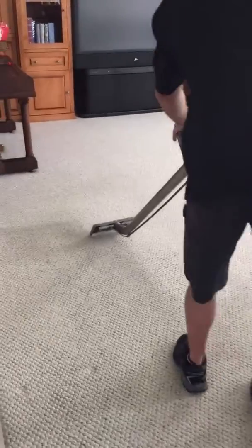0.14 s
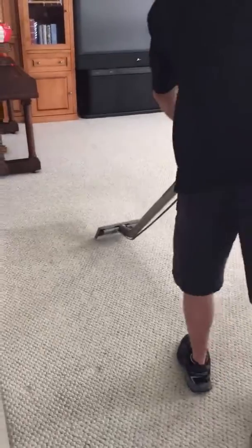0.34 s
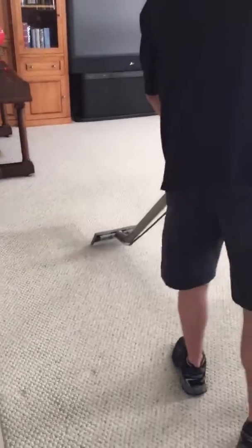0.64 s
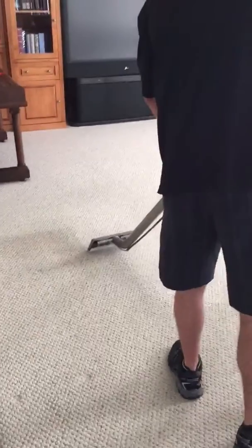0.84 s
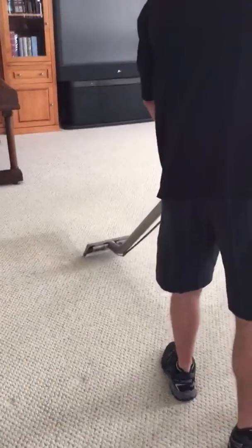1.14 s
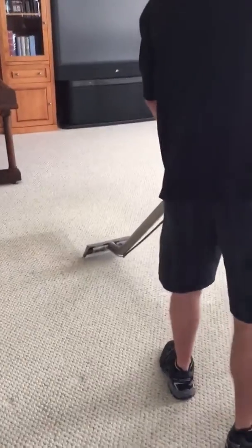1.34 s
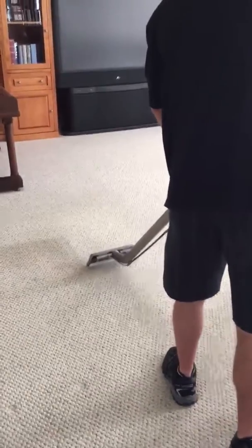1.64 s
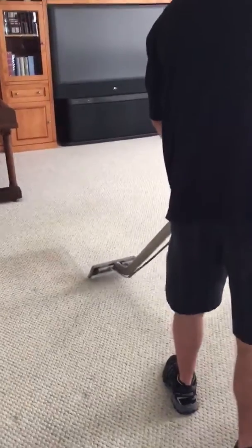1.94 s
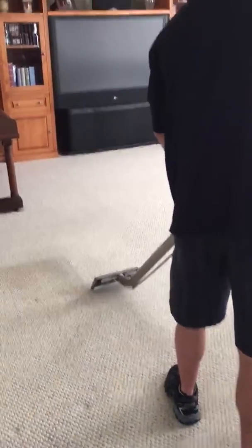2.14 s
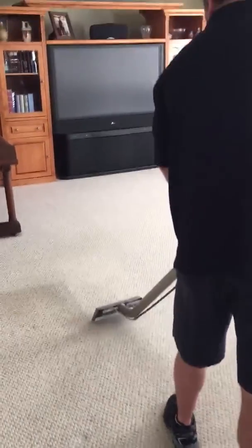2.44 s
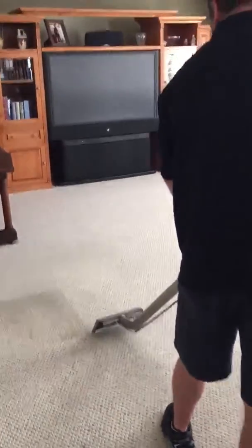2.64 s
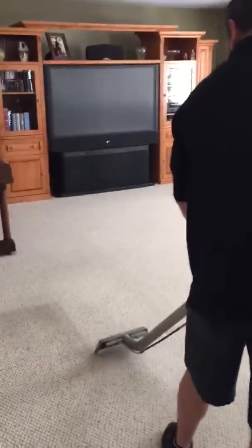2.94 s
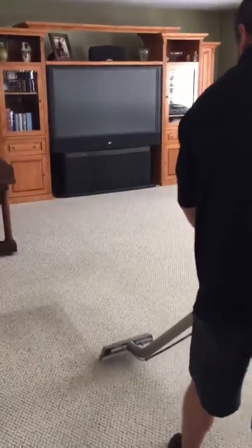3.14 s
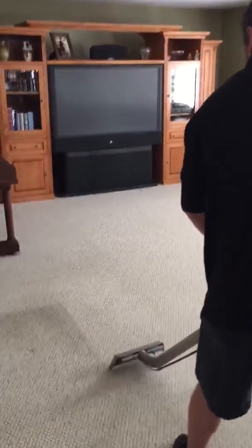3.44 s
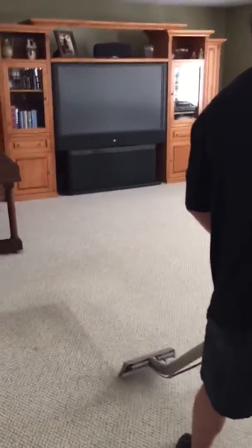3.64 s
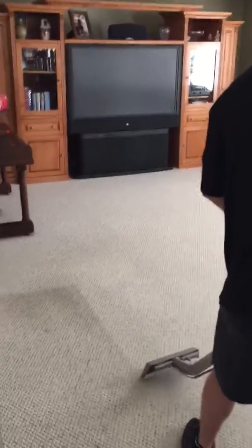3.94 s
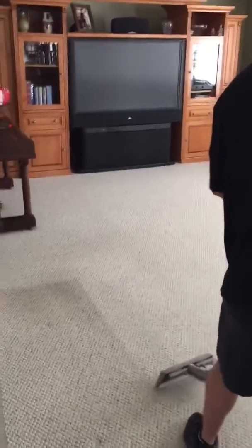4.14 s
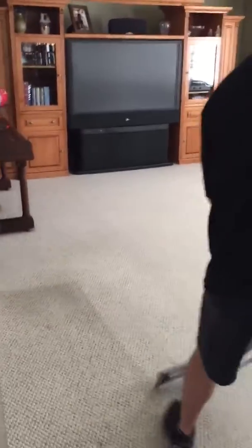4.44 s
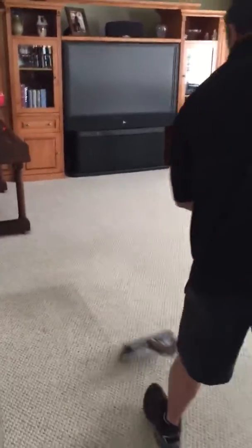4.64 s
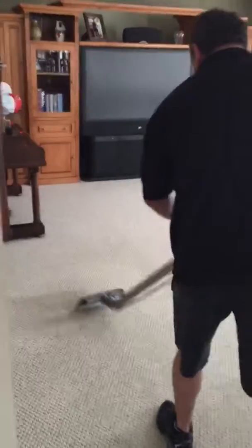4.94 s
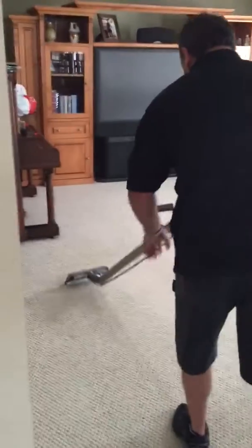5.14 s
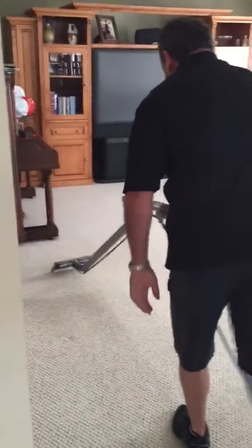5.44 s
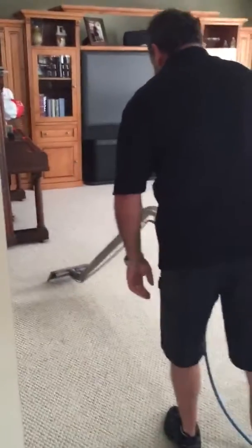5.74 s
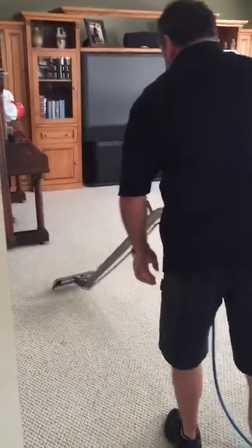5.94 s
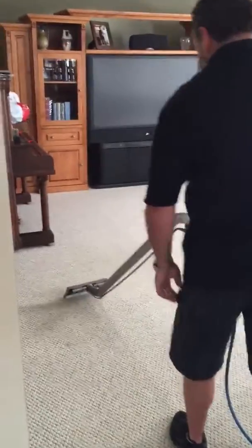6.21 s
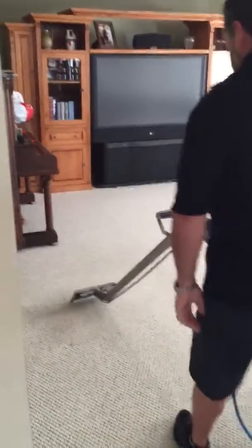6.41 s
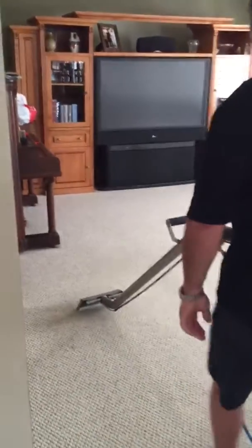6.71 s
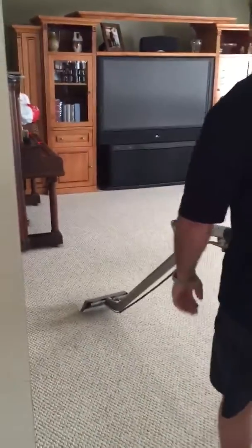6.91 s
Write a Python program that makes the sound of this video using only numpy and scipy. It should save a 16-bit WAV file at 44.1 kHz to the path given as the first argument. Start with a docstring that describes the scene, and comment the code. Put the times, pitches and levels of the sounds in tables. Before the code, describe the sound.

A carpet cleaning wand hisses brightly with steady suction over a low throbbing vacuum hum, then gulps air hollowly and rubs the pile before settling.

```python
"""A carpet extraction wand is drawn over carpet in a living room, while the vacuum blower hums some way off.
From the start, air hisses through the sealed slot (coloured noise) and the blower throbs (wavering tones).
After a second the lip lifts for a moment. At about four seconds it starts to lift again and again, gulping
air with a hollow roar (noise and rings), and the head and hose rub low and lumpily on the pile (low noise).
At the end the steadier hiss returns. Throughout, sliding echoes colour the sound of the air."""
import sys
import numpy as np
from scipy import signal
from scipy.fft import rfft, irfft, next_fast_len
from scipy.io import wavfile
from scipy.ndimage import map_coordinates

SR = 44100
rng = np.random.default_rng(int(sys.argv[2]) if len(sys.argv) > 2 else 0)


def pcm_store(signal):
    """Save signal as 16-bit PCM."""
    levels = np.round(np.clip(np.atleast_2d(signal), -1, 1) * 32767)
    wavfile.write(sys.argv[1], SR, levels.astype(np.int16).T)


N = 311787
TIME = np.arange(N) / SR  # s


def from_db(db):
    """Turn decibels into a gain."""
    return 10 ** (np.asarray(db) / 20)


def rms_one(x):
    """Scale a sound to an rms of 1."""
    return x / np.sqrt(np.mean(x ** 2) + 1e-20)


def in_time(rows):
    """Draw straight lines between the rows: one curve for each column after the time."""
    seconds, *columns = np.transpose(rows)
    return [np.interp(TIME, seconds, column) for column in columns]


def swell(start, attack, hold, release):
    """A gesture that rises from 0 to 1, holds and falls back; all times in s."""
    corners = start + np.cumsum([0, attack, hold, release])
    return np.interp(TIME, corners, [0, 1, 1, 0])


def drift(rate_hz):
    """Slow random wandering with an rms of 1, worked out every 40 samples."""
    pole = np.exp(-2 * np.pi * rate_hz * 40 / SR)
    noise = rng.standard_normal(N // 40 + 2002)
    slow = signal.lfilter([1], [1, -2 * pole, pole ** 2], noise)
    slow = slow[2000:]  # skip the filter's start
    return np.interp(np.arange(N) / 40, np.arange(len(slow)), rms_one(slow))


def turbulence(spectrum):
    """Churning air or rubbing: noise with the given colour, rms 1."""
    size = next_fast_len(N)
    hz, db = np.transpose(spectrum)
    bins_hz = np.maximum(np.fft.rfftfreq(size, 1 / SR), 1)
    gain = from_db(np.interp(np.log(bins_hz), np.log(hz), db, left=-70, right=-70))
    noise = rng.standard_normal(size)
    return rms_one(irfft(rfft(noise) * gain, size)[:N])


def moving_resonance(centre_hz, width_hz):
    """A band of noise around a pitch that may move, like air ringing in a cavity; rms 1."""
    low = signal.butter(2, width_hz / 2, fs=SR, output="sos")
    a, b = signal.sosfilt(low, rng.standard_normal((2, N)))
    phase = 2 * np.pi * np.cumsum(centre_hz * np.ones(N)) / SR
    return rms_one(a * np.cos(phase) + b * np.sin(phase))


def low_pass(cutoff_hz):
    """A gentle filter that dulls the treble."""
    return signal.butter(1, cutoff_hz, fs=SR, output="sos")


def echo(x, lag_ms):
    """The sound after a delay that may change."""
    return map_coordinates(x, [np.arange(N) - lag_ms * SR / 1000], order=1, mode="mirror")


# air through the sealed slot, before trims, lifts and flutter:
# (t/s, jet level/dB, spray level/dB, tube rush level/dB, edge control/dB)
SUCTION = [(0, -28, -32, -36, -3), (0.28, -27, -31, -37, -1.5), (0.62, -29.0, -31, -37, -2.5),
           (1.0, -28, -30, -35.5, -2), (1.7, -28, -31, -35.5, -2.5), (2.3, -28, -29, -35.5, -2.5),
           (2.85, -29.5, -32, -36, -3.3), (3.25, -28.9, -31.5, -35.5, -3), (3.9, -29.5, -32.5, -35.5, -4),
           (4.83, -29.5, -31.5, -39, -3), (4.9, -30.5, -31, -38.5, -4), (4.95, -28, -32.5, -39, -1.5),
           (5.2, -28.5, -33, -37.5, -3.5), (5.5, -30.5, -32.5, -37, -2.5), (5.9, -29.6, -32, -37.5, -2),
           (6.5, -28, -33, -36.5, -2.5), (7.07, -28.3, -30.8, -36, -2)]
# colour of the wet air rushing up the tube: (f/Hz, relative level/dB per Hz)
RUSH_COLOUR = [(200, -33), (380, -16.5), (480, -15), (570, -8.5), (760, -8.5), (1020, -4), (1500, -3),
               (2200, 0.3), (2700, -1.5), (3700, -0.5), (4400, -4), (5100, -6.5), (7000, -31), (12000, -43)]


def wand(sizzle_db, gurgle_db, spray_loss_share, uneven_db):
    """Suction makes hiss at the lip and a rush in the tube; lifting the lip trades hiss for a hollow roar."""
    jet_db, spray_db, rush_db, edge_control_db = in_time(SUCTION)
    gulp, lost_db, gained_db = open_lip(rough_db=0.2, ring_width_hz=88)
    lost_db = lost_db + uneven_db * drift(13.0)
    jet_db = jet_db - lost_db
    spray_db = spray_db - spray_loss_share * lost_db
    hiss = slot_hiss(jet_db, spray_db, edge_control_db, flutter_db=0.53, spray_flutter_db=0.6)
    sizzle = from_db(spray_db + sizzle_db) * droplets(per_s=1000, spread_db=2.5, low_hz=4500)
    trim_db = 2
    rush_gain = from_db(rush_db + gained_db + trim_db + gurgle_db * drift(30))
    rush = rush_gain * turbulence(RUSH_COLOUR)
    return hiss + sizzle, rush + gulp


# colour of the air jet in the slot: (f/Hz, relative level/dB per Hz)
JET_COLOUR = [(3500, -25), (4900, -10), (5300, -2.5), (5650, 1), (6100, 1.5), (6550, 0.5), (6950, 0),
              (7550, -2.5), (8150, -1.8), (9600, -2.5), (10050, -5), (10400, -24), (11500, -30)]
# colour of the fine water spray: (f/Hz, relative level/dB per Hz)
SPRAY_COLOUR = [(9000, -26), (10450, -2), (10850, 0.3), (12000, 1), (13200, -0.6), (14150, -2.5),
                (15100, -1.5), (16000, -12)]
# pitch of the slot edge's ring as the wand is drawn in and tilts: (t/s, f/Hz)
EDGE_PITCH = [(0, 9010), (1.2, 9320), (2.4, 9000), (3.7, 8720), (5.0, 8960), (5.9, 9080), (7.07, 9000)]


def slot_hiss(jet_db, spray_db, edge_control_db, flutter_db, spray_flutter_db):
    """A jet of air, the ring of the slot's edge and water torn to spray; they flutter as tufts pass the lip."""
    edge_gain = from_db(7.5 + 3.65 * edge_control_db)  # ring against the jet's noise
    ring = moving_resonance(in_time(EDGE_PITCH)[0], width_hz=1730)
    jet = (turbulence(JET_COLOUR) + edge_gain * ring) / np.sqrt(1 + edge_gain ** 2)
    trim_db = -0.22
    jet = jet * from_db(jet_db + trim_db + flutter_db * drift(31))
    spray = turbulence(SPRAY_COLOUR) * from_db(spray_db + spray_flutter_db * drift(16))
    return jet + spray


def droplets(per_s, spread_db, low_hz):
    """Tiny drops hit the steel throat at random: clicks without their low part make a fine sizzle, rms 1."""
    sizes = from_db(spread_db * np.minimum(rng.exponential(1, N), 4))
    sizes = sizes * rng.choice([-1, 1], N)
    hits = sizes * (rng.random(N) < per_s / SR)
    high = signal.butter(2, low_hz, "high", fs=SR, output="sos")
    return rms_one(signal.sosfilt(high, hits + 1e-18))


# the lip lifts off the pile; a negative loss makes the hiss louder: (start t/s, opening t/s, open t/s,
# closing t/s, hiss loss/dB, rush gain/dB, roar level/dB, ring f/Hz, ring level/dB)
LIFTS = [(1.21, .03, .03, .06, 1.5, -0.5, -54, 1280, -64), (3.95, 0.33, 0.12, .035, 6.0, 2, -38, 1245, -42),
         (4.37, 0.036, 0.14, 0.038, 3.5, 0.6, -37.5, 1302, -43.2),
         (4.43, 0.048, 0.085, .05, 0.1, 1, -41, 797, -44),
         (4.55, .035, 0.085, 0.096, 4.0, 1.0, -50, 947, -49),
         (4.75, 0.038, .025, 0.068, -0.8, 0.5, -41, 1090, -49),
         (5.3, 0.22, .08, 0.06, 0.3, -1.5, -44, 687, -51),
         (5.53, 0.018, 0.031, 0.04, -1, 1.5, -36.2, 1222, -37.5)]
# air that always leaks under the lip, before the head's ring is added: (t/s, level/dB)
LEAK = [(0, -48), (1.8, -60), (3.0, -47), (4.0, -46), (4.9, -51.5), (5.8, -46.5), (6.4, -46.5), (7.07, -49)]
# colour of the leaking air: (f/Hz, relative level/dB per Hz)
LEAK_COLOUR = [(380, -32), (600, -12.5), (790, -9.5), (1000, -1), (1150, -9), (1300, -6), (1500, -2),
               (1870, 1), (2220, -9), (2700, -13), (4000, -14), (8000, -30)]
# hollow colour of the gulped air: (f/Hz, relative level/dB per Hz)
ROAR_COLOUR = [(250, -33), (550, -7), (860, -5), (970, 3), (1130, -3), (1280, -7), (1400, 2), (1560, 2),
               (1850, -7), (2220, 1), (2600, -21), (4000, -16), (5500, -24), (10000, -35)]


def open_lip(rough_db, ring_width_hz):
    """Air gulped under the lip roars and rings in the head; also gives the hiss lost and rush gained in dB."""
    head_ring = from_db(-1.3) * moving_resonance(1276, width_hz=133)
    leak = from_db(in_time(LEAK)[0]) * (turbulence(LEAK_COLOUR) + head_ring)
    power, rings, lost_db, gained_db = 0, 0, 0, 0
    for start, attack, hold, release, loss_db, gain_db, roar_db, ring_hz, ring_db in LIFTS:
        opening = swell(start, attack, hold, release)
        power = power + (opening * from_db(roar_db)) ** 2
        rings = rings + opening * from_db(ring_db) * moving_resonance(ring_hz, ring_width_hz)
        lost_db = lost_db + opening * loss_db
        gained_db = gained_db + opening * gain_db
    roar = np.sqrt(power) * from_db(rough_db * drift(40)) * turbulence(ROAR_COLOUR)
    return leak + roar + rings, lost_db, gained_db


# head and hose rub over the pile: (start t/s, attack t/s, hold t/s, release t/s, level/dB before lumps)
RUBS = [(3.87, 0.28, 0.45, .06, -47), (4.44, .05, .05, .06, -57), (4.597, .08, 0.12, 0.13, -39),
        (4.82, .1, .2, 0.3, -41), (5.121, .3, .24, .04, -44), (5.52, 0.044, 0.054, .05, -53)]
# colour of the rubbing: (f/Hz, relative level/dB per Hz)
RUBBING_COLOUR = [(30, -24), (50, -14), (63, -1), (90, -4), (130, -7), (185, 1.5), (250, 0), (340, -8),
                  (600, -9), (900, -11.5), (2000, -10)]


def rubbing(lumpy_db, gust_db):
    """Head and hose rub on the pile: low noise whose strength wavers quickly and slowly."""
    effort = sum(from_db(db) * swell(*timing) for *timing, db in RUBS)
    lumps = from_db(lumpy_db * drift(50) + gust_db * drift(9))
    return effort * lumps * turbulence(RUBBING_COLOUR)


# delay of the wall's reflection as the wand travels: (t/s, lag/ms)
PATH = [(0, 3.67), (.3, 3.73), (1.4, 3.795), (2.2, 3.765), (2.6, 3.65), (3.1, 3.605), (3.5, 3.63),
        (3.9, 3.77), (4.4, 3.93), (4.7, 3.8), (5.05, 3.3), (5.3, 3.04), (5.45, 2.955), (5.75, 2.985),
        (6.5, 3.18), (7.07, 3.265)]
# the wall and the surfaces near it: (lag added to the wall's/ms, share of the reflection's strength)
SURFACES = [(0, 0.89), (.135, 0.32), (-1.546, 0.31)]


def reflections(x, strength, dull_hz):
    """Near echoes strengthen some pitches and weaken others; these slide as the wand moves."""
    dull = signal.sosfiltfilt(low_pass(dull_hz), x)
    lag_ms, = in_time(PATH)
    echoes = sum(share * echo(dull, lag_ms + extra_ms) for extra_ms, share in SURFACES)
    return x + strength * echoes


def room(x, t60, wet_db, dull_hz, count=32):
    """Weak echoes from walls and furniture; each path lengthens or shortens as the wand travels."""
    travel_ms = in_time(PATH)[0] - PATH[0][1]
    dull = signal.sosfilt(low_pass(dull_hz), x)
    lags_ms = np.geomspace(7, 60, count) * rng.uniform(.9, 1.1, count)
    directions = rng.uniform(-3, 3, count)  # how far each path follows the wand
    gains = from_db(-60 * lags_ms / 1000 / t60) * rng.choice([-1, 1], count)  # t60: s to fade by 60 dB
    paths = zip(gains, lags_ms, directions)
    tail = sum(gain * echo(dull, lag + way * travel_ms) for gain, lag, way in paths)
    return x + from_db(wet_db) * tail / np.linalg.norm(gains)


# the blower: (t/s, pulse f/Hz, hum level/dB before trim and throb)
BLOWER = [(0, 141.1, -43), (1.0, 142.1, -43), (3.0, 142.1, -43.5), (4.7, 141.8, -41.5), (5.9, 144.1, -40),
          (7.07, 142.5, -42.3)]
# steady tones of the engine, before their slight wander: (f/Hz, level against the blower curve/dB)
ENGINE = [(86.5, -14.5), (119.4, -20), (64, -22)]
# colour of the machine's rumble: (f/Hz, relative level/dB per Hz)
RUMBLE_COLOUR = [(20, -32), (33, -19), (50, -9), (68, -4), (95, 1), (125, 1.5), (165, -0.5), (208, -0.5),
                 (232, -4.5), (285, -6), (340, -12.5), (600, -17.5)]


def machine(throb_db, throb_hz, octave_db, wander_hz):
    """The blower's pulses make a throbbing hum, over the engine's wandering tones and a low noise rumble."""
    pulse_hz, hum_db = in_time(BLOWER)
    phase = 2 * np.pi * np.cumsum(pulse_hz) / SR
    hum = rms_one(np.sin(phase) + from_db(octave_db) * np.sin(2 * phase))
    trim_db = -0.06
    hum = hum * from_db(trim_db + throb_db * moving_resonance(throb_hz, width_hz=5.1))
    tones = 0
    for hz, db in ENGINE:
        tone_phase = 2 * np.pi * np.cumsum(hz + wander_hz * drift(4.9)) / SR
        tones = tones + from_db(db) * rms_one(np.sin(tone_phase))
    rumble = from_db(-51) * turbulence(RUMBLE_COLOUR)
    return from_db(hum_db) * (hum + tones) + rumble


# strength of the near reflections: (t/s, gain for the rush, gain for the hiss)
BOUNCE = [(0, .2, .3), (1.5, .14, .27), (3.5, .14, .22), (4.5, .14, .08), (5.5, 0.23, 0.41),
          (7.07, .24, .26)]


def scene():
    """The wand in the room, over the machine; both channels carry the same sound."""
    hiss, rush = wand(sizzle_db=-14.5, gurgle_db=0.67, spray_loss_share=0.89, uneven_db=0.28)
    rush_bounce, hiss_bounce = in_time(BOUNCE)
    air = reflections(hiss, hiss_bounce, dull_hz=9000) + reflections(rush, rush_bounce, dull_hz=5500)
    air = room(air, t60=0.25, wet_db=-9.5, dull_hz=8900)
    rubs = rubbing(lumpy_db=1.5, gust_db=1.0)
    blower = machine(throb_db=0.63, throb_hz=8.6, octave_db=-39, wander_hz=1.22)
    mix = air + rubs + blower
    return np.array([mix, mix])


def record(dry):
    """The treble is cut steeply above 15230 Hz."""
    steep = signal.ellip(12, .05, 90, 15230, fs=SR, output="sos")  # 0.05 dB ripple, 90 dB cut
    return signal.sosfilt(steep, dry)


dry = scene()
out = record(dry)
pcm_store(out)
```